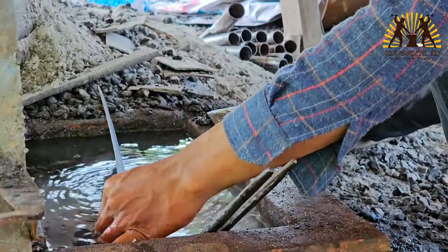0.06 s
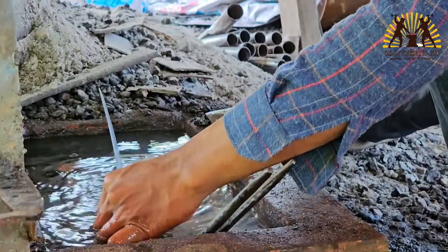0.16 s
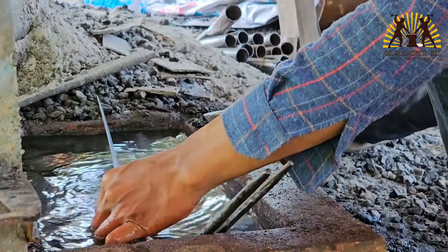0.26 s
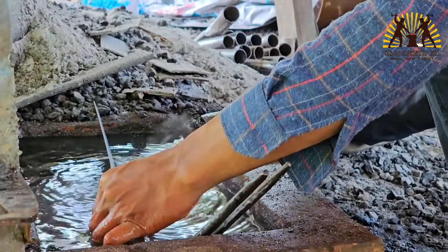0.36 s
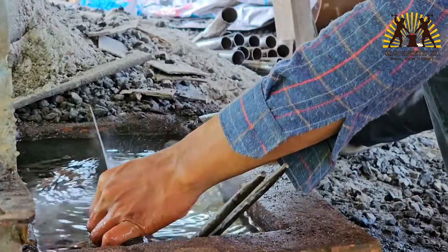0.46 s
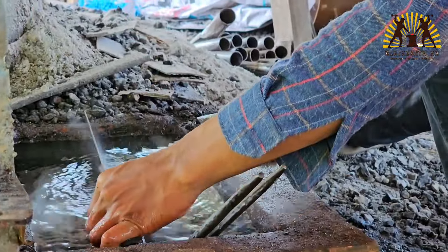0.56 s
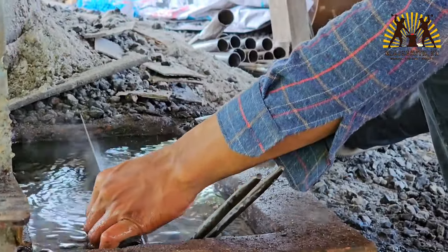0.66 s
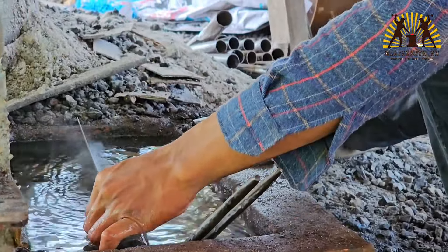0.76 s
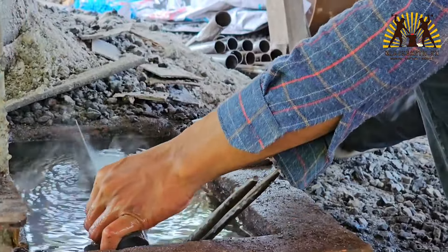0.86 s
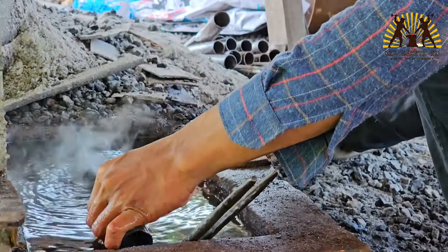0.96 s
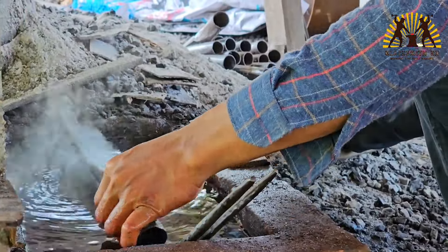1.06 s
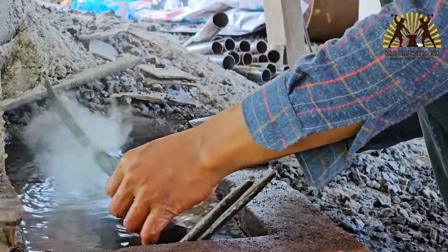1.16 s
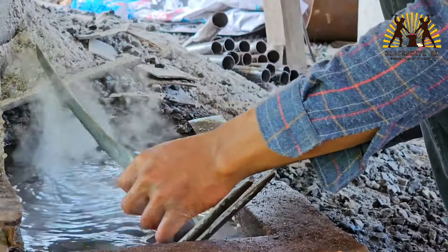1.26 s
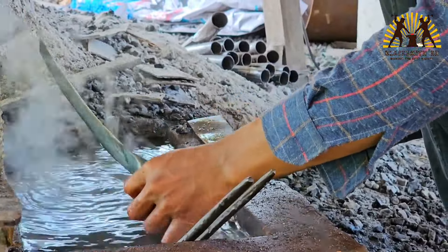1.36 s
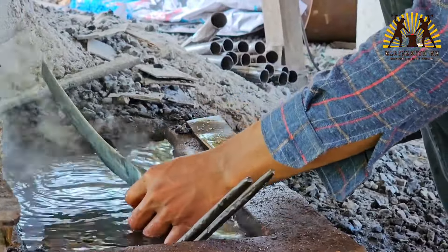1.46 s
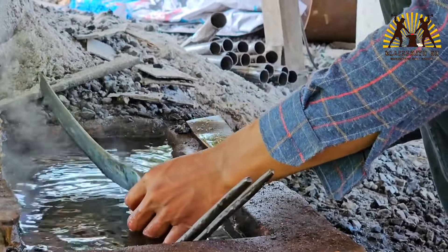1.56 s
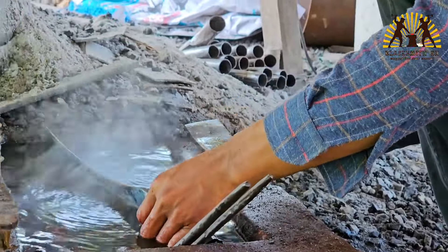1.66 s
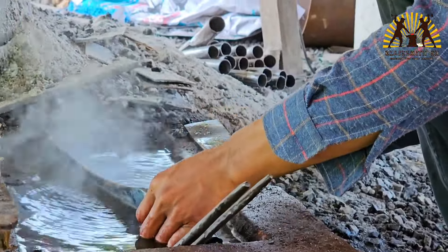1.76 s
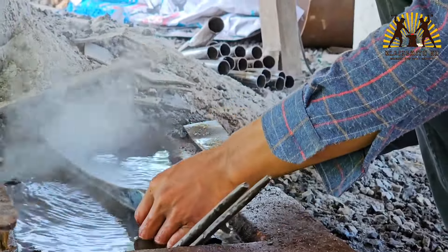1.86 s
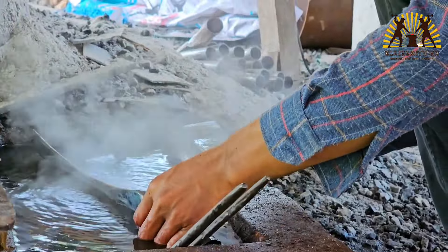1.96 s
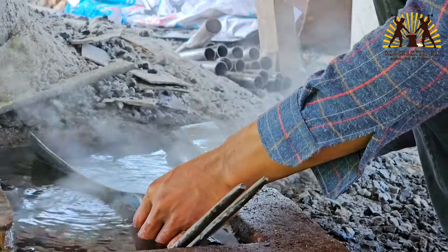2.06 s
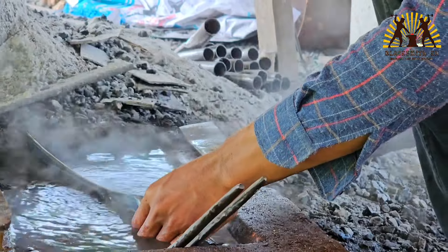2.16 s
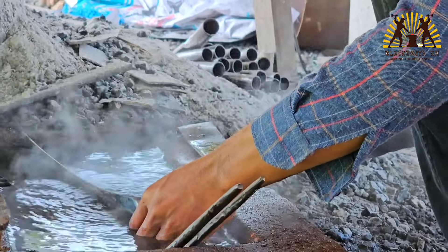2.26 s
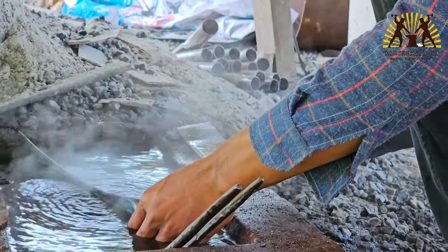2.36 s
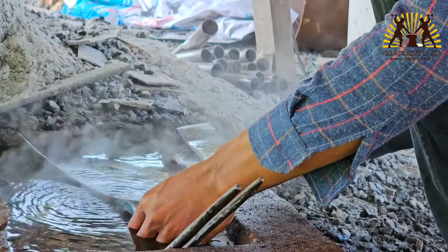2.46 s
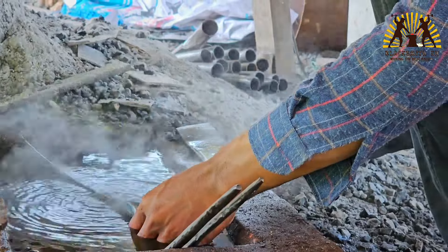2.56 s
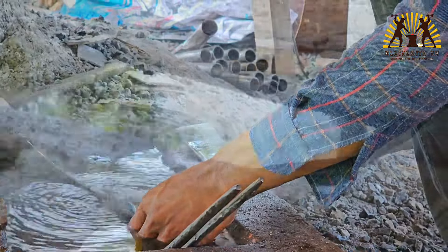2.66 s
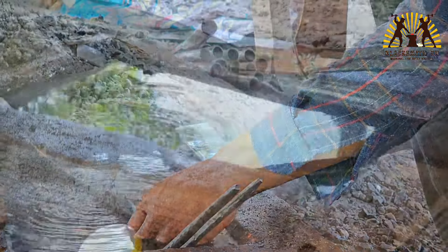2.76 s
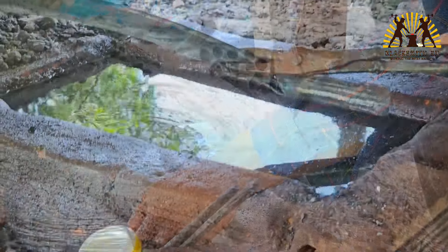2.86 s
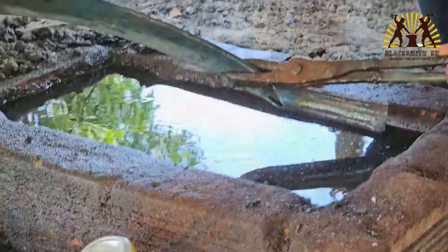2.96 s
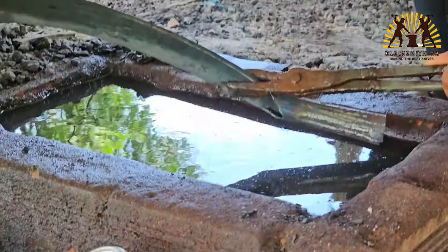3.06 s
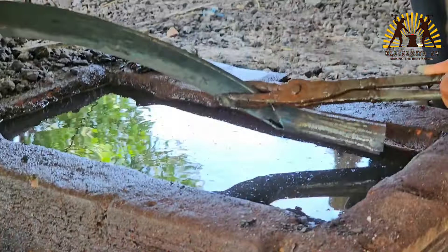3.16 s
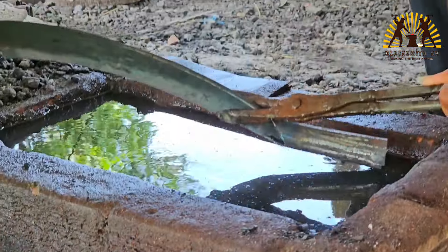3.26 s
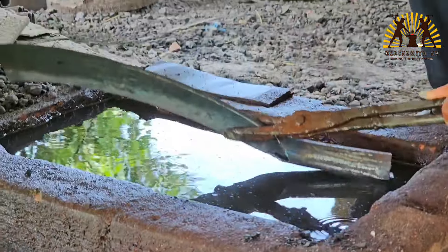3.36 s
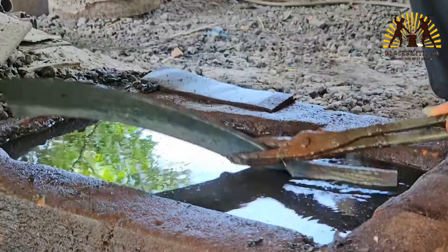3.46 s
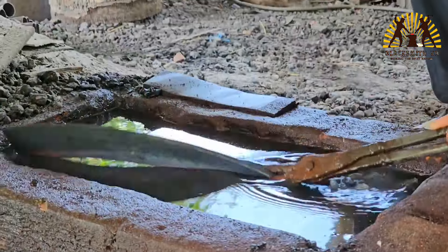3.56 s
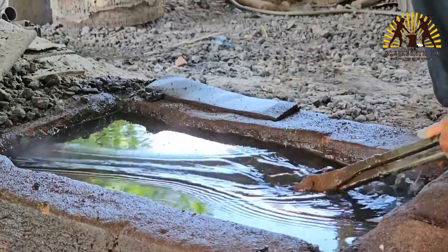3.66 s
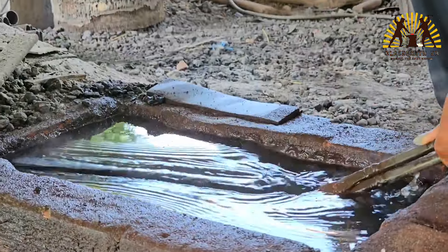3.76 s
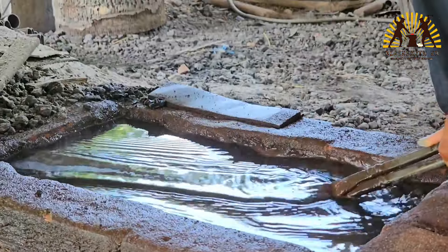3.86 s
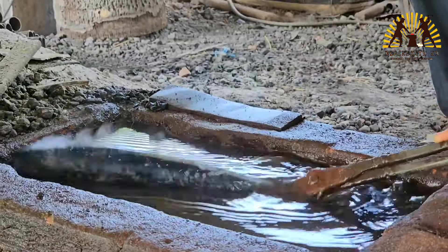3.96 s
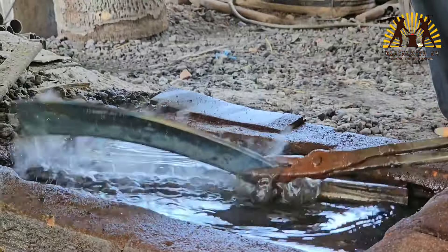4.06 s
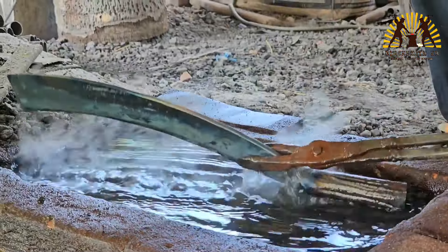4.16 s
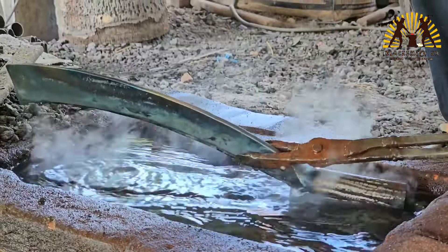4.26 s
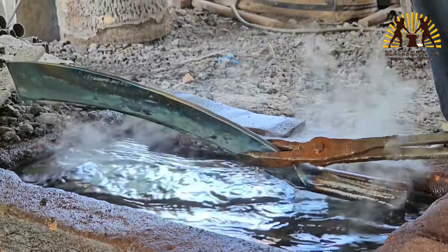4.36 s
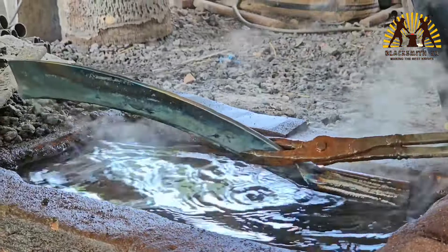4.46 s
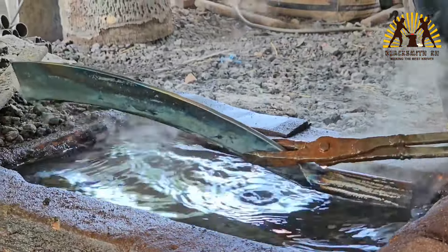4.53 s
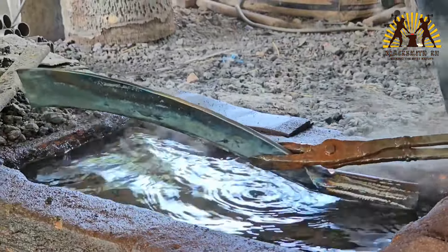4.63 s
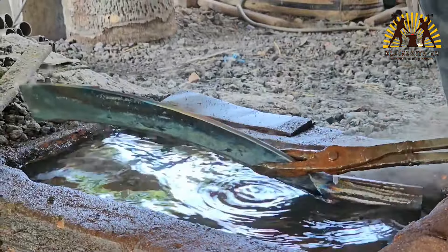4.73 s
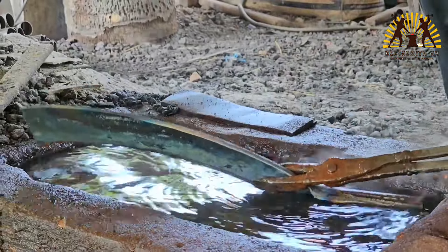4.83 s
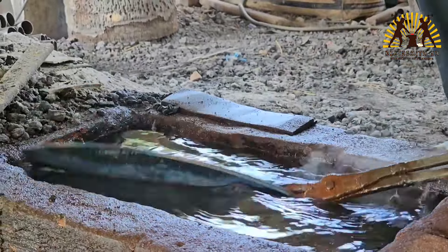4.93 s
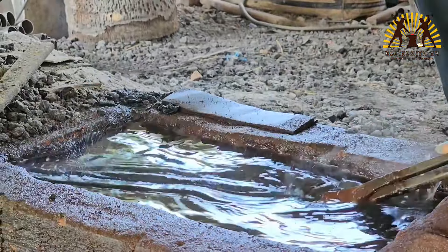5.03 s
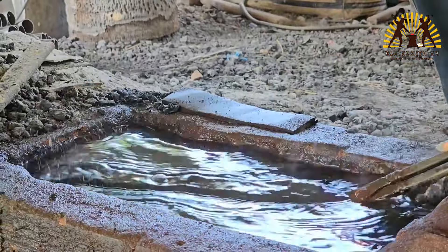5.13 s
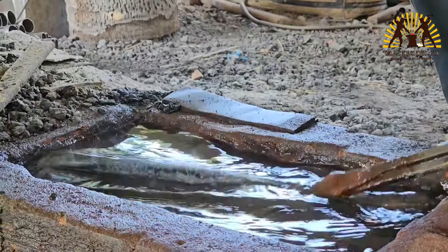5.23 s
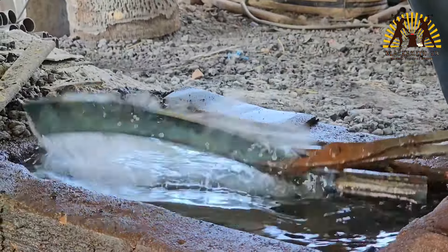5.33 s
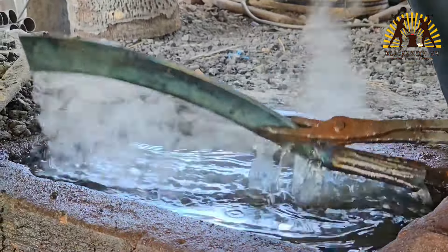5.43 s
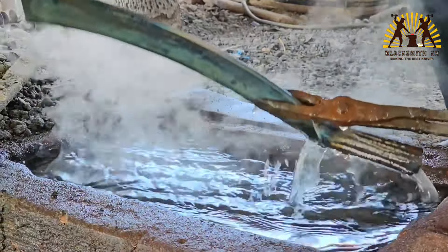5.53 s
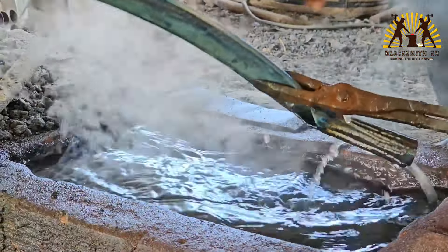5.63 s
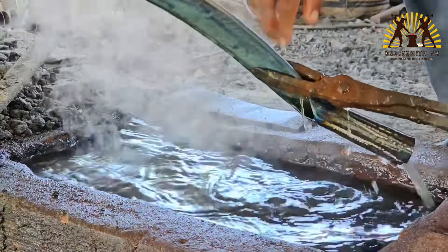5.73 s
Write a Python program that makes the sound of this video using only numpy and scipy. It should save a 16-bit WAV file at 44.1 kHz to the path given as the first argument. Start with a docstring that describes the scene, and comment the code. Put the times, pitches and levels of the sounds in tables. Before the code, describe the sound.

Steam hiss and bubbling crackle from hot metal quenched in water, with two gurgling plunges and a loud final clack against the trough.

```python
"""Hot blade quenched in a trough

A hot steel blade, first in the hand, then in tongs, is dipped again and again into a water trough outdoors.
Steam is flickering band noise; the boil is random clicks ringing like collapsing bubbles, lower when deeper.
Vapour pockets are trembling sines, water gurgles as low bubbles and slaps the trough's resonances.
Narrow resonances and broad bright bands colour the water; behind lie a faint yard noise and a breeze
rumbling on two microphone ports."""
import sys
import numpy as np
from scipy import signal
from scipy.fft import rfft, irfft, next_fast_len
from scipy.io import wavfile

SR = 44100
rng = np.random.default_rng(int(sys.argv[2]) if len(sys.argv) > 2 else 0)


def log_audio(samples):
    """Write samples as a 16-bit WAV file to the path given in sys.argv[1]."""
    # one column per channel
    frames = np.atleast_2d(samples).T
    # limit to full scale, then quantise
    limited = np.clip(frames, -1, 1)
    pcm = np.round(limited * 32767).astype(np.int16)
    wavfile.write(sys.argv[1], SR, pcm)


N = 255401     # length in samples


def from_db(db):
    """Decibels to amplitude gain."""
    return 10 ** (np.asarray(db) / 20)


def rms_one(x):
    """Scale to unit rms."""
    return x / np.sqrt(np.mean(x ** 2) + 1e-20)


def in_time(rows):
    """Draw straight automation lines through a table, one per column after t/s."""
    t, *columns = np.transpose(rows)
    return [np.interp(np.arange(N) / SR, t, column) for column in columns]


def at_hz(points, hz):
    """Read a curve of f/Hz and value on a log-frequency axis."""
    table_hz, values = np.transpose(points)
    return np.interp(np.log(hz), np.log(table_hz), values)


def nearness(hz, centre_hz, spread):
    """1 at the centre, falling away gently over the octaves."""
    distance = np.log2(hz / centre_hz) / np.maximum(spread, .1)
    return (1 + distance ** 2) ** -1.6


def hump(peak_s, rise_s, fall_s, peak_db):
    """Power of a rounded swell, 20 dB down rise_s before and fall_s after its peak."""
    power = np.zeros(N)
    start = max(round((peak_s - 2 * rise_s) * SR), 0)
    stop = min(round((peak_s + 2 * fall_s) * SR), N)
    span = np.arange(start, stop)
    after = span / SR - peak_s
    slope = after / np.where(after < 0, rise_s, fall_s)
    power[span] = from_db(2 * (peak_db - 20 * slope ** 2))
    return power


def drift(rate_hz):
    """Slow random wander of unit rms: noise through two one-pole low-passes at rate_hz."""
    step = 40     # samples between the slow points
    r = np.exp(-2 * np.pi * rate_hz * step / SR)
    slow = signal.lfilter([1], [1, -2 * r, r * r], rng.standard_normal(N // step + 2002))
    slow = slow[2000:]     # skip the filter's start-up
    return np.interp(np.arange(N) / step, np.arange(len(slow)), rms_one(slow))


def ring(clicks, hz, t60):
    """Each click sets off a sine that dies by 60 dB in t60 seconds; a unit click gives height 1."""
    r, w = from_db(-60 / (t60 * SR)), 2 * np.pi * hz / SR
    return signal.lfilter([0, np.sin(w)], [1, -2 * r * np.cos(w), r * r], clicks + 1e-18)


def banded_noise(spectrum, shared_db, own_db):
    """Two unrelated noises in half-octave bands, whose levels flicker together and alone."""
    out, together = 0, drift(11.7)
    edges = 20 * 2 ** np.arange(0, 10.1, .5)
    white = rng.standard_normal((2, 2, N))
    for k, (low, high) in enumerate(zip(edges, edges[1:])):
        hz = np.sqrt(low * high)
        if spectrum[0][0] < hz < spectrum[-1][0] * np.sqrt(2):
            # neighbouring bands take turns on two noises, so they stay unrelated
            band = signal.sosfilt(signal.butter(2, [low, high], "band", fs=SR, output="sos"), white[k % 2])
            band_db = at_hz(spectrum, hz) + shared_db * together + own_db * drift(15.5)
            out = out + from_db(band_db) * band
    return rms_one(out)


def bubbles(pitch_hz, spread, low_hz, high_hz, per_s, cycles, uneven_db, count):
    """Random collapses ring a few cycles; voices near the current pitch are the loudest."""
    excess = np.minimum(rng.exponential(1, (2, N)), 3)
    sizes = from_db(uneven_db * excess) * rng.choice([-1, 1], (2, N))
    born = rng.random((2, N)) < per_s / SR
    dealt = rng.integers(0, count, (2, N))     # which voice each collapse belongs to
    out, power = 0, 1e-9
    for k, hz in enumerate(np.geomspace(low_hz, high_hz, count)):
        share = nearness(hz, pitch_hz, spread)
        voice = rms_one(ring(sizes * born * (dealt == k), hz, cycles / hz))
        out, power = out + share * voice, power + share ** 2
    return out / np.sqrt(power)


# spectrum of the yard: (f/Hz, relative level per Hz/dB)
YARD_SPECTRUM = [(180, 13.5), (300, -16), (500, 0), (800, -8.5), (2500, -11), (8000, -24.5), (16000, -31)]
YARD_DB = -56


def yard():
    """Faint outdoor background: nearly steady shaped noise."""
    return from_db(YARD_DB) * banded_noise(YARD_SPECTRUM, shared_db=.3, own_db=.3)


# spectrum of wind rumble: (f/Hz, relative level per Hz/dB)
WIND_SPECTRUM = [(12, -37), (20, -11.5), (54, 8), (166, -10), (193, -13.5), (230, -15), (331, -32),
                 (400, -77), (520, -78), (880, -120)]
# gusts on the ports: (peak t/s, rise and fall/s per 20 dB with sign ignored and 0 silent,
# level/dB, left minus right/dB)
GUSTS_ON_PORTS = [(.1, 0, -49, -9), (.66, -1.13, -42, 3), (.8, 0.07, -33, -5), (1.3, 0.35, -42.5, -3),
                  (2.03, 0.4, -41, -3), (2.25, 0.94, -40, -5), (2.55, 0, -47, -6), (3.06, -1.5, -47.5, 2),
                  (3.47, -0.6, -42, 1), (3.74, 0.28, -38, 8), (3.92, 0.1161, -24.5, 2),
                  (4.18, 0.17, -31, 2.5), (4.6, 0.5, -44, 10.5), (5.37, 0.29, -38.5, 13.5),
                  (5.55, 0.17, -29.5, 2), (5.701, 0.02, -29.5, -14)]
BREEZE_DB, BREEZE_PAN_DB = -50.5, -0.5     # steady level, left minus right


def breeze():
    """Lumpy low noise, partly its own on each port; gusts swell in power and lean to one side."""
    sides = np.array([[.5], [-.5]])     # left, right
    power = from_db(2 * (BREEZE_DB + BREEZE_PAN_DB * sides))
    for s, width_s, db, pan_db in GUSTS_ON_PORTS:
        power = power + from_db(2 * pan_db * sides) * hump(s, abs(width_s), abs(width_s), db)
    common, own = banded_noise(WIND_SPECTRUM, shared_db=3.5, own_db=2.5)
    return np.sqrt(power) * rms_one(common + .64 * own * [[1], [-1]])


# stirred water: (t/s, level/dB, f/Hz)
STIRRED_WATER = [(0, -57, 262), (.48, -57, 247), (.534, -50, 245), (.7, -79, 282), (1.3, -63.5, 293),
                 (2.9, -60.5, 477), (3.06, -43.5, 440), (3.2, -65, 404), (3.55, -68, 378), (3.7, -43, 468),
                 (3.85, -48, 470), (3.9, -42.5, 484), (4.2, -46.5, 430), (4.45, -56, 390), (4.95, -65, 307),
                 (5.19, -37, 506), (5.24, -34, 400), (5.39, -36.5, 325), (5.46, -45, 350), (5.53, -41, 370),
                 (5.62, -53.5, 390), (5.79, -58, 420)]


def gurgle():
    """Stirred water traps air: low bubbles ring around a wandering pitch."""
    gurgle_db, gurgle_hz = in_time(STIRRED_WATER)
    air = bubbles(gurgle_hz, .45, 210, 800, per_s=1500, cycles=12, uneven_db=2.5, count=10)
    return from_db(gurgle_db) * air


# knocks and slaps against the trough: (t/s, level/dB, splash gain/dB, burst time constant/s, thud centre f/Hz)
TROUGH_SLAPS = [(0.287, -40.5, 5, 0.021, 516), (2.987, -28.5, -7, 0.021, 268),
                (3.044, -27, 2.5, 0.0071, 344), (3.127, -37, 7, 0.012, 500),
                (3.279, -36.5, -13, 0.016, 221), (3.491, -37, 2, 0.014, 345),
                (4.201, -19.5, -10, 0.0023, 320), (4.206, -19, -14, 0.0045, 310),
                (4.212, -27.5, -12, 0.0089, 260), (4.248, -29, -10, 0.015, 279),
                (4.953, -29, -0.5, 0.013, 202), (5.044, -25.5, -13, 0.019, 240),
                (5.075, -27.5, -8, 0.017, 242), (5.467, -6.5, -12, 0.0021, 320),
                (5.472, -7.5, -9.5, 0.0042, 300), (5.479, -9.5, -10, 0.0089, 238),
                (5.501, -23, -6, 0.0065, 340), (5.529, -34.5, -6, 0.005, 600), (5.683, -49, 0, 0.02, 700),
                (5.759, -50, 1, 0.012, 800)]
# resonances of the trough: (f/Hz, relative level/dB, 60 dB decay/s)
TROUGH_MODES = [(210, -20, 0.0046), (275, 1.5, 0.043), (400, 2, 0.025), (527, 7, 0.037), (679, 12, 0.031),
                (975, 14.5, 0.051)]


def slaps():
    """Each blow is a sharp contact and a ragged burst: a thud in the trough's modes and a bright splash."""
    out = np.zeros((2, N))
    ragged = rng.standard_normal((2, N))
    hollow = signal.butter(2, 170, "high", fs=SR, output="sos")      # the thin walls radiate no deep bass
    bright = signal.butter(1, [900, 5000], "band", fs=SR, output="sos")
    for s, level_db, splash_db, burst_s, thud_hz in TROUGH_SLAPS:
        start = round(s * SR)
        after = np.arange(min(N - start, SR // 10)) / SR
        span = slice(start, start + len(after))
        blow = ragged[:, span] * np.exp(-(after / burst_s) ** 2)
        blow[0, 0] += 9.0      # the first contact, alike on both ports
        thud = 0
        for hz, db, t60 in TROUGH_MODES:
            thud = thud + from_db(db - 29.5) * nearness(hz, thud_hz, 0.88) * ring(blow, hz, t60)
        thud = signal.sosfilt(hollow, thud)
        splash = from_db(splash_db) * signal.sosfilt(bright, np.clip(blow, -4, 4))
        out[:, span] += from_db(level_db) * (thud + splash)
    return out


# large vapour pockets, single or overlapping:
# (middle t/s, middle f/Hz, level/dB, half length/s, pitch change over the whole length/octaves)
VAPOUR_POCKETS = [(.498, 4900, -39, .014, 0), (.635, 3600, -36, .016, 0.17), (.69, 3650, -32, .022, -.1),
                  (.773, 2324, -32, .016, 0), (1.08, 3400, -36.5, .06, 0), (2.601, 1407, -39, .015, 0),
                  (2.601, 2235, -32.5, 0.014, 0.36), (2.655, 1150, -34.5, 0.019, 0.1),
                  (2.665, 2400, -40, 0.034, -.1), (3.564, 1993, -32, 0.025, 0.083),
                  (3.618, 1088, -28, 0.021, -0.1), (3.619, 2535, -30, 0.028, -0.092),
                  (3.756, 2480, -18.5, 0.032, -1.1), (3.78, 1508, -16.5, 0.022, -0.081),
                  (3.825, 1356, -21.5, 0.048, -.2), (3.81, 1072, -25, .03, -0.018),
                  (3.911, 936, -24, 0.025, -.1), (3.945, 863, -36, 0.034, -0.1),
                  (3.915, 1416, -37, .03, 0.27), (3.915, 500, -33, .025, 0), (4.02, 486, -41, 0.064, 0),
                  (4.07, 2300, -30, 0.021, .6), (4.09, 3110, -22.5, 0.039, 0.088),
                  (4.25, 3300, -35, .06, .1), (4.32, 1780, -37, 0.11, .1), (4.565, 1530, -46.5, .06, 0),
                  (4.44, 3840, -45.5, 0.11, -1.06), (5.132, 1387, -23, 0.024, 0.24),
                  (5.142, 2276, -23.5, 0.039, -0.55), (5.15, 3070, -23.5, 0.042, 0.19),
                  (5.175, 1560, -21.5, 0.026, 0.12), (5.17, 1980, -26, .03, -0.05),
                  (5.168, 489, -26.5, 0.027, 0.24), (5.198, 500, -31, .022, 0.093),
                  (5.205, 1700, -37, .03, -0.54), (5.352, 920, -42, 0.024, .1),
                  (5.708, 120, -32, 0.025, 0.38)]


def pockets(rough_hz):
    """A pocket sings, swells and dies; its wall trembles up to about rough_hz for each kHz of pitch."""
    out = np.zeros((2, N))
    smooth = signal.butter(2, rough_hz, fs=SR, output="sos")
    real, imaginary = signal.sosfilt(smooth, rng.standard_normal((2, 2, N)))
    # a small steady tone plus a random wobble of height and phase
    tremble = [[.3], [.3j]] + .9 * (rms_one(real) + 1j * rms_one(imaginary))
    for s, hz, level_db, length_s, octaves in VAPOUR_POCKETS:
        span = np.arange(round((s - length_s) * SR), round((s + length_s) * SR))
        place = (span / SR - s) / length_s     # -1 at the start, 1 at the end
        turns = np.cumsum(hz * 2 ** (octaves * place / 2)) / SR
        swell = from_db(level_db) * np.cos(np.pi / 2 * place) ** 2
        wall = tremble[:, (span * hz // 1000).astype(int) % N]     # higher pockets tremble faster
        out[:, span] += swell * np.real(wall * np.exp(2j * np.pi * turns))
    return out


# the whole blade goes under: (in t/s, out t/s, fall of boil pitch it sinks towards/octaves, sinking time constant/s)
BLADE_PLUNGES = [(3.755, 4.082, 1.59, 0.062), (5.121, 5.388, 1.63, 0.1)]
SURFACE_S = 0.036     # time constant of coming up


def depth():
    """How far under the blade is, in octaves of boil pitch: sinks and levels off, then comes up."""
    t, under = np.arange(N) / SR, 0
    for in_s, out_s, octaves, sink_s in BLADE_PLUNGES:
        sinking = 1 - np.exp(-np.maximum(t - in_s, 0) / sink_s)
        surfacing = 1 - np.exp(-np.maximum(out_s - t, 0) / SURFACE_S)
        under = under + octaves * sinking * surfacing
    return under


# sizzle while hot steel touches water, quiet when lifted clear; levels before muffling:
# (t/s, steam level/dB, boil level/dB)
SIZZLE_LEVELS = [(0, -41.5, -41.5), (.482, -41.5, -43), (.495, -38, -39), (.7, -35, -32.5),
                 (.79, -34.5, -36), (.91, -38.5, -39.5), (1.05, -35.5, -37.5), (1.16, -38, -38),
                 (1.204, -45, -40), (1.28, -62, -63), (1.747, -63, -79), (1.755, -32, -39.5),
                 (1.95, -34, -46.5), (2.48, -32, -58), (2.667, -35.5, -35.5), (2.85, -36.5, -50.5),
                 (3.1, -38.5, -40.5), (3.115, -42.5, -53), (3.26, -66, -69), (3.43, -58.5, -75),
                 (3.55, -34, -48.5), (4.26, -34, -35.5), (4.455, -42, -51.5), (4.68, -45, -60),
                 (4.755, -48.5, -52.5), (4.915, -45.5, -54.5), (4.96, -36, -50.5), (5.503, -34.5, -30.5),
                 (5.651, -45.5, -52), (5.79, -48.5, -53)]
# bursts of steam and boil, at the surface and under water; rise and fall span 20 dB, pitch is before depth lowers it:
# (peak t/s, rise/s, steam fall/s, boil fall/s, steam level/dB, boil level/dB, boil f/Hz, spread/octaves)
STEAM_AND_BOIL_BURSTS = [(.534, 0.033, 0.12, 0.2, -35, -36.5, 4550, 1.2),
                         (3.279, 0.0044, 0.049, 0.14, -48, -62, 2470, 0.52),
                         (3.615, 0.14, 0.066, 0.14, -48, -38, 3280, 1.3),
                         (3.724, 0.026, 0.14, 0.064, -21.5, -23, 3900, 0.92),
                         (3.784, 0.04, 0.05, 0.17, -28, -23.5, 3750, 0.6),
                         (3.915, 0.055, 0.024, 0.018, -48, -30.5, 3570, 1.34),
                         (4.1, 0.052, 0.013, 0.0091, -29, -22, 3420, 0.82),
                         (4.138, 0.065, 0.043, 0.13, -30.5, -44, 2370, 0.89),
                         (4.204, 0.0072, 0.069, 0.024, -26, -28.5, 2300, 1.1),
                         (4.3, 0.088, 0.16, 0.077, -50, -43, 2400, 0.26),
                         (4.65, 0.35, 0.071, 0.13, -48.5, -49.5, 1500, 1.2),
                         (5.02, 0.048, 0.078, 0.017, -29, -30.5, 4600, 0.55),
                         (5.137, 0.074, 0.025, 0.066, -26, -26, 3060, 1.2),
                         (5.177, 0.082, 0.043, 0.039, -31, -24, 3440, 1.16),
                         (5.389, 0.024, 0.073, 0.037, -23.5, -25, 3020, 1.3),
                         (5.472, 0.0048, .06, .06, -48, -24, 2060, 1.03)]
REGRIP_S = 3.2     # from the hand to the tongs
SIZZLE_IN_HAND_HZ, SIZZLE_IN_TONGS_HZ = 2920, 2300     # boil pitch at the surface
STEAM_MUFFLE_DB, COVERED_OCTAVES = 19.5, 0.34     # the sizzle's steam is smothered once the blade is covered
BOIL_MUFFLE_DB = 2     # on the sizzle's boil, per octave of depth
SIZZLE_SPREAD_OCTAVES, SPREAD_PER_OCTAVE_DOWN = 1, 0.83     # bubble sizes vary more under water


def quench():
    """Steam gain, boil gain, boil pitch and spread: sizzle and bursts add in power, depth lowers the pitch."""
    under = depth()
    steam_db, boil_db = in_time(SIZZLE_LEVELS)
    steam_power = from_db(2 * (steam_db - STEAM_MUFFLE_DB * np.tanh(under / COVERED_OCTAVES)))
    boil_power = from_db(2 * (boil_db - BOIL_MUFFLE_DB * under))
    in_hand = np.arange(N) < REGRIP_S * SR
    # pitch and spread are averaged with boil power as the weight
    pitch = boil_power * np.log2(np.where(in_hand, SIZZLE_IN_HAND_HZ, SIZZLE_IN_TONGS_HZ))
    spread = boil_power * (SIZZLE_SPREAD_OCTAVES + SPREAD_PER_OCTAVE_DOWN * under)
    for s, rise_s, steam_fall_s, boil_fall_s, burst_steam_db, burst_boil_db, hz, octaves in STEAM_AND_BOIL_BURSTS:
        burst = hump(s, rise_s, boil_fall_s, burst_boil_db)
        steam_power = steam_power + hump(s, rise_s, steam_fall_s, burst_steam_db)
        boil_power = boil_power + burst
        pitch = pitch + burst * np.log2(hz)
        spread = spread + burst * octaves
    boil_hz = 2 ** (pitch / boil_power - under)
    return np.sqrt(steam_power), np.sqrt(boil_power), boil_hz, spread / boil_power


# spectrum of the steam: (f/Hz, relative level per Hz/dB)
STEAM_SPECTRUM = [(300, -27), (600, -2.5), (1200, -5), (2200, 2), (5000, 2), (8000, 0.5), (11500, 1),
                  (16000, 0)]


def steam(gain):
    """Steam hisses off the steel as broad, flickering noise."""
    return gain * banded_noise(STEAM_SPECTRUM, shared_db=0.87, own_db=2.0)


def boil(gain, pitch_hz, spread):
    """Vapour bubbles collapse in a dense crackle of short rings."""
    return gain * bubbles(pitch_hz, spread, 576, 7400, per_s=4000, cycles=18.3, uneven_db=2.0, count=24)


# colour of blade and trough in the hand, narrow resonances and broad bright bands: (f/Hz, width/Hz, level/dB)
COLOUR_IN_HAND = [(854, 9.5, 4), (1172, 33, 5.5), (1660, 16, 4), (2250, 48, 0), (3390, 26, -2),
                  (3670, 83, 0.5), (4600, 74, -9), (8240, 2400, -12), (11600, 360, -4.5)]
# colour of blade and trough in the tongs, narrow resonances and broad bright bands: (f/Hz, width/Hz, level/dB)
COLOUR_IN_TONGS = [(470, 38, -2), (1124, 18, 1.5), (1344, 39, 3.5), (1529, 40, 5.5), (1990, 24, 0.5),
                   (2855, 32, 1.5), (3002, 28, 4), (3280, 35, 6.5), (3860, 840, -7), (4820, 540, -5.5),
                   (11960, 130, 0.5), (14900, 450, -4)]


def blade_and_trough_colour(x):
    """Band-pass peaks driven by the water sound are added to it, one set before the regrip and one after."""
    out, regrip = x.copy(), round(REGRIP_S * SR)
    for peaks, held in ((COLOUR_IN_HAND, slice(0, regrip)), (COLOUR_IN_TONGS, slice(regrip, N))):
        for hz, width_hz, db in peaks:
            r = np.exp(-np.pi * width_hz / SR)
            b = (1 - r * r) / 2 * np.array([1, 0, -1])
            a = [1, -2 * r * np.cos(2 * np.pi * hz / SR), r * r]
            out[:, held] += from_db(db) * signal.lfilter(b, a, x[:, held])
    return out


# left-right likeness: (f/Hz, likeness from 0 to 1, held to 0.97 at most)
PORT_LIKENESS = [(200, 1), (600, 0.98), (1000, 0.73), (1400, 1), (2000, 0.073), (2900, 0.18), (4500, 0.025),
                 (15000, 0.026)]
# balance of the ports: (f/Hz, left minus right level/dB)
PORT_BALANCE = [(60, 0), (180, -3), (550, 0.5), (1650, -1), (4970, -1.5), (15000, 1.5)]
RIGHT_LAG_S = 0.00018


def ports(pair):
    """Two unrelated renderings become left and right: alike in the bass, the right port a little later."""
    size = next_fast_len(N + 64)
    hz = np.maximum(np.fft.rfftfreq(size, 1 / SR), 1)
    alike = np.clip(at_hz(PORT_LIKENESS, hz), 0, .97)
    mid, side = rfft(pair, size) * np.sqrt([1 + alike, 1 - alike]) / np.sqrt(2)
    tilt = from_db(at_hz(PORT_BALANCE, hz) / 2)
    left = (mid + side) * tilt
    right = (mid - side) / tilt * np.exp(-2j * np.pi * hz * RIGHT_LAG_S)
    return irfft([left, right], size)[:, :N]


def scene():
    """Blade, water and yard through the ports, the breeze on top."""
    steam_gain, boil_gain, boil_hz, spread = quench()
    water = steam(steam_gain) + boil(boil_gain, boil_hz, spread) + gurgle()
    through_ports = yard() + slaps() + pockets(rough_hz=95) + blade_and_trough_colour(water)
    return breeze() + ports(through_ports)


def record(dry):
    """The top is cut steeply, 70 dB down from 16 kHz."""
    return signal.sosfilt(signal.cheby2(22, 70, 16000, fs=SR, output="sos"), dry)


dry = scene()
out = record(dry)
log_audio(out)
```